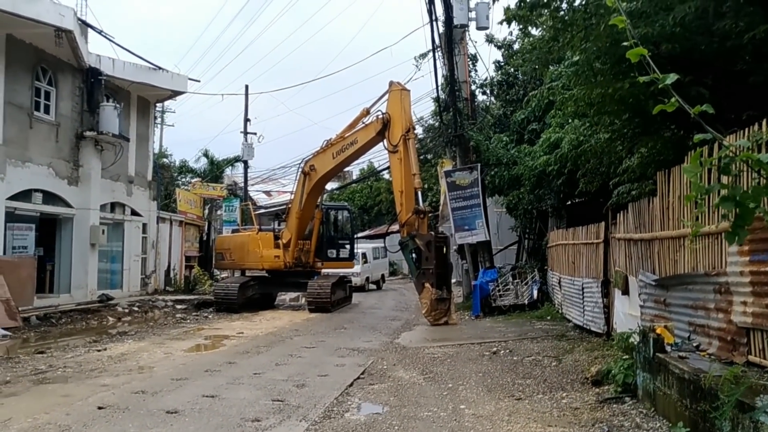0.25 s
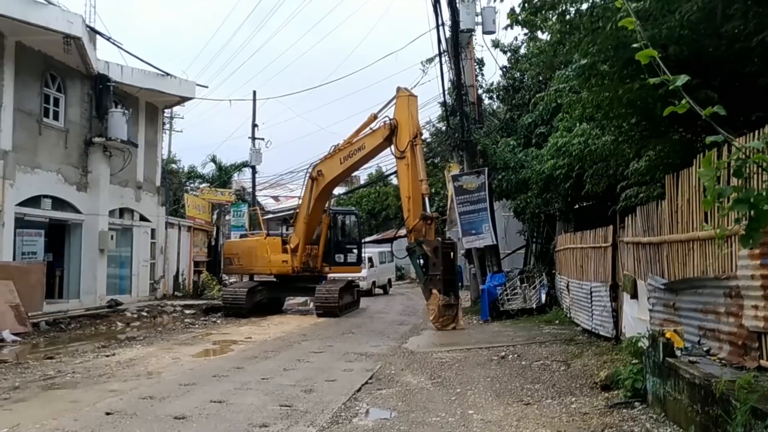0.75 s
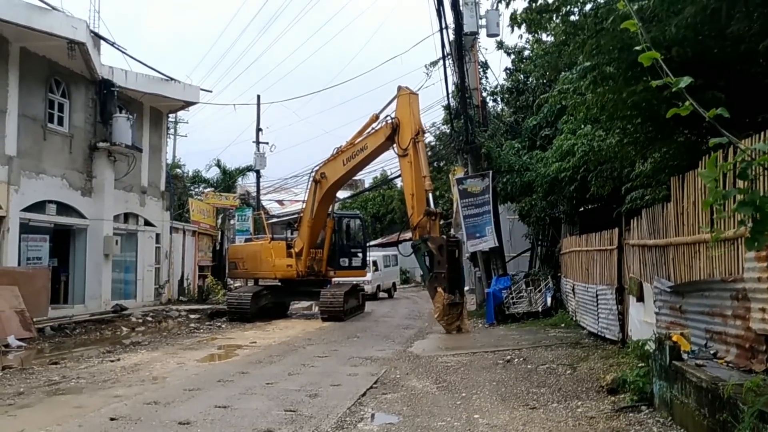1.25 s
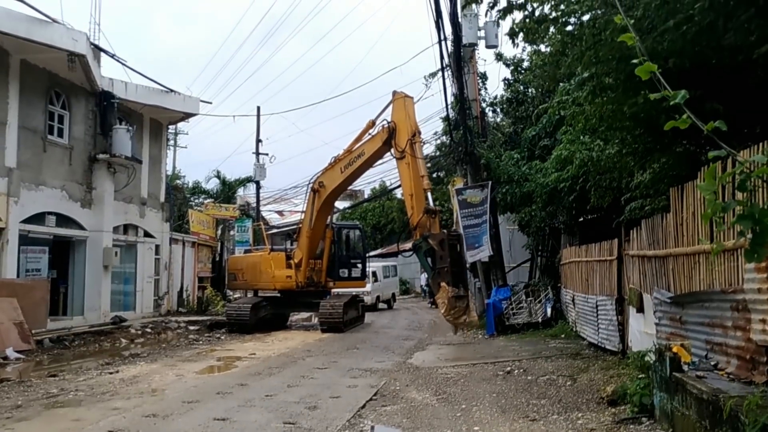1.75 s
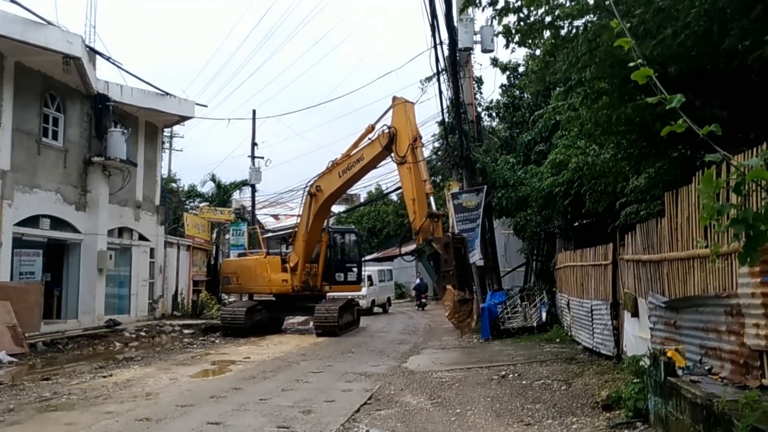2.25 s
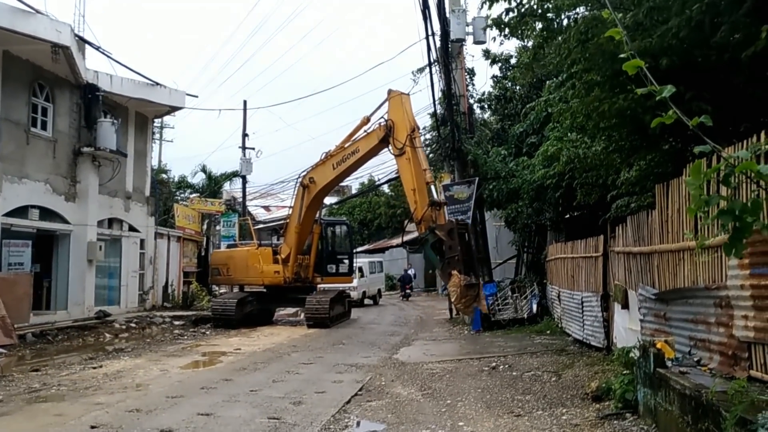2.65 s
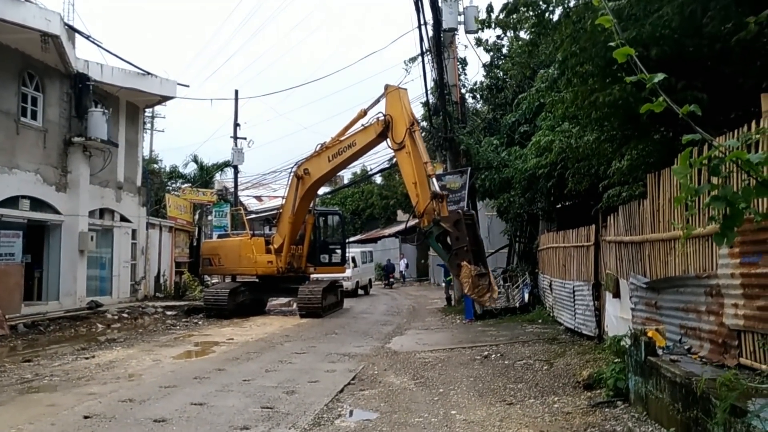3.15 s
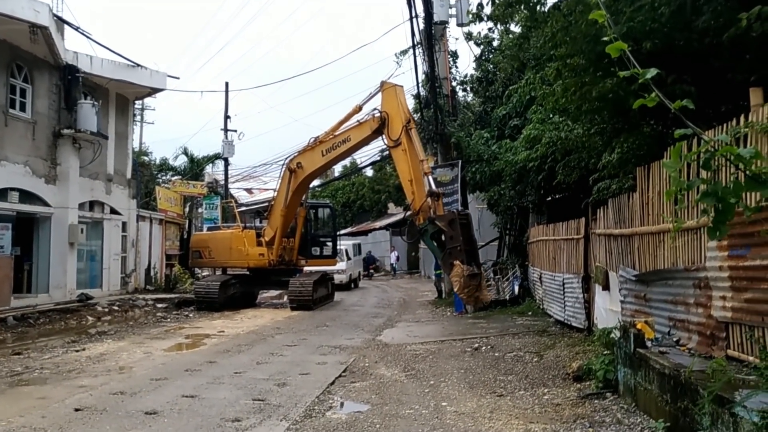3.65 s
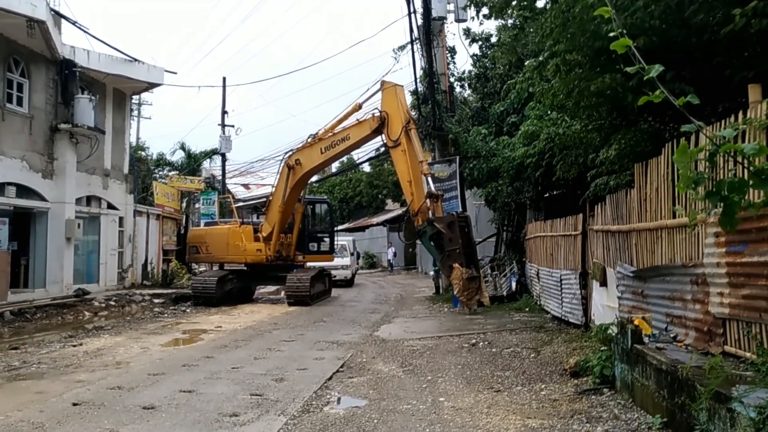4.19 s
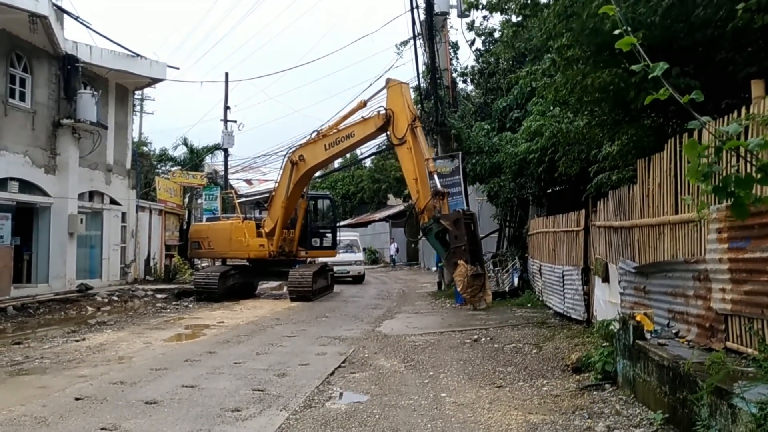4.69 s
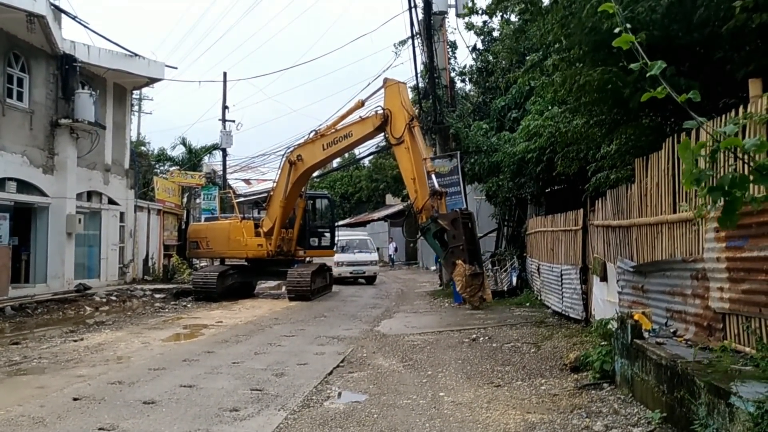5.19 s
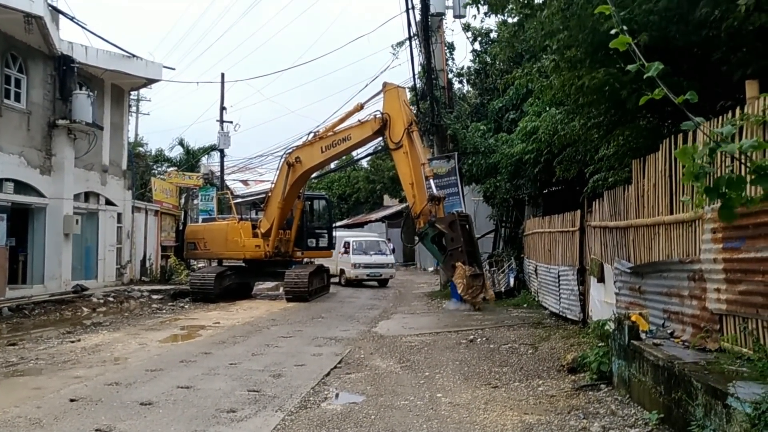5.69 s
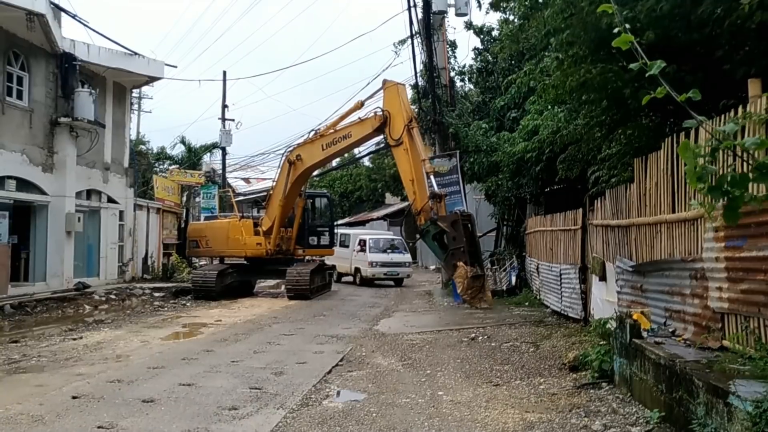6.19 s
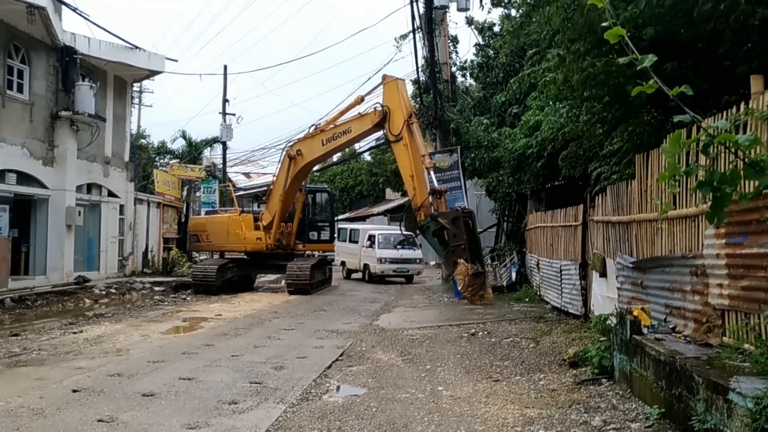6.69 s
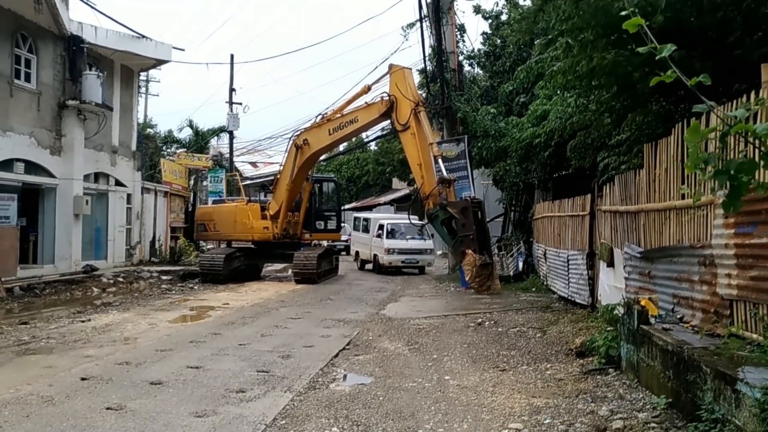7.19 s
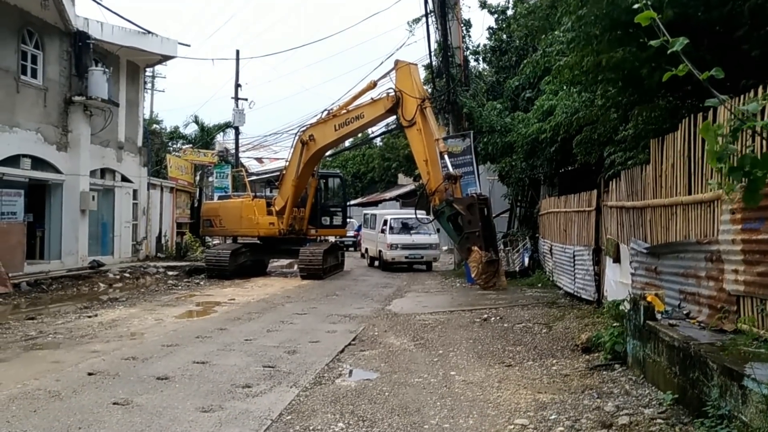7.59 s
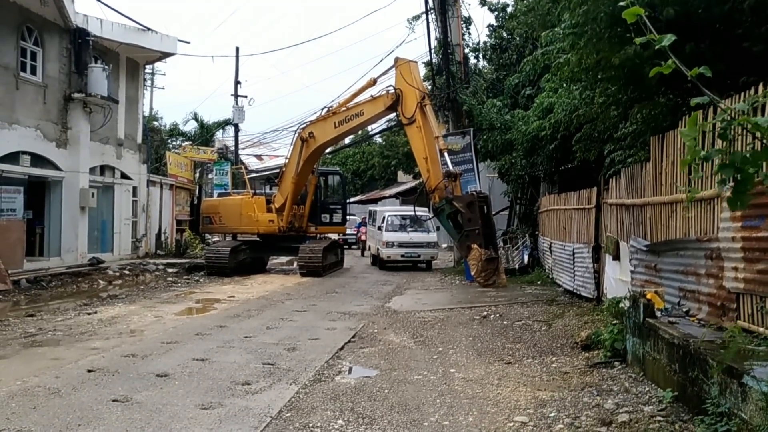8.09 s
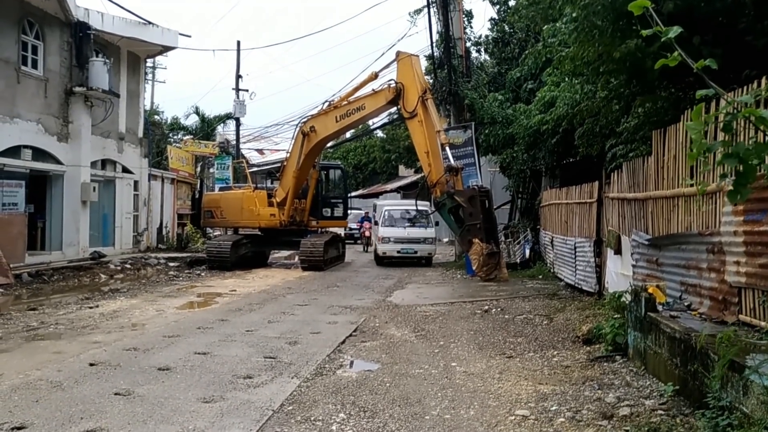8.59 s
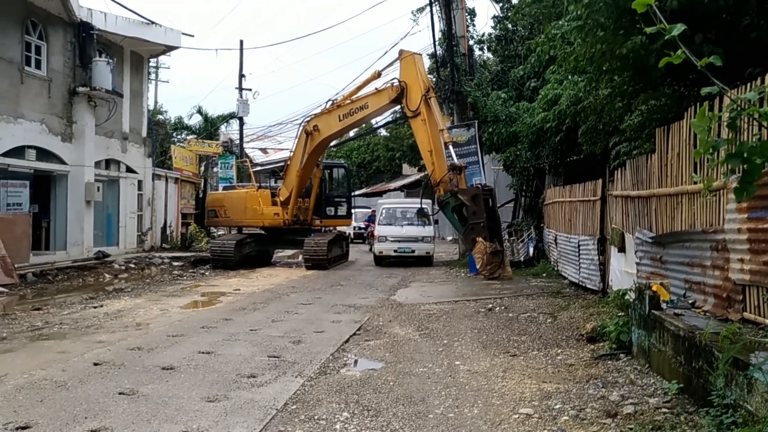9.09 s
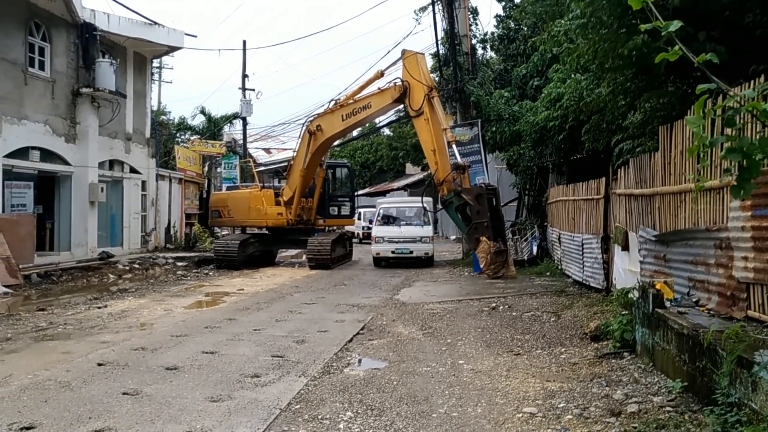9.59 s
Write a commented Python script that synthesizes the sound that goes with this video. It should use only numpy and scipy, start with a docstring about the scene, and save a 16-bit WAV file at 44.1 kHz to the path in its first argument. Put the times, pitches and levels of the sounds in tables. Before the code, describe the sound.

An excavator's hydraulic hammer strikes a concrete road in sharp, rapid blows, its loose steel housing clanking and ringing. After a second it stops, leaving the steady diesel drone, fading rattles and a little shifting rubble. About four seconds later the hammering starts again and keeps an even beat to the end. The machine is heard from a short way down a narrow street, with echoes off the houses.

```python
"""Sharp hammer blows and rattling steel come first: an excavator is breaking a concrete road.
An oil-driven piston strikes a chisel, and each crack slaps back from the houses of a narrow street.
The loose steel housing rattles and rings most when the chisel is not pressed down firmly.
After a second the hammer rests while the boom moves, leaving the six-cylinder diesel with its fan,
pump and turbo whistle, and a little shifting rubble. About four seconds later the blows start again."""
import sys
import numpy as np
from scipy import signal
from scipy.fft import rfft, irfft, next_fast_len
from scipy.io import wavfile
from scipy.ndimage import uniform_filter1d, minimum_filter1d

SR = 44100
rng = np.random.default_rng(int(sys.argv[2]) if len(sys.argv) > 2 else 0)


def persist_wave(psi):
    """Save psi, clipped to +-1, as 16-bit WAV."""
    counts = np.round(np.clip(psi, -1, 1) * 32767).astype(np.int16)
    wavfile.write(sys.argv[1], SR, np.atleast_2d(counts).T)


N = 434385
T = np.arange(N) / SR  # seconds since the start
AGE = np.arange(SR) / SR  # seconds since a hit

# Levels in the tables are relative: the functions set how loud each sound ends up.
# how often the engine fires, steady under load and wandering while the boom moves: t/s, f/Hz
FIRING_RATE = [(0.85, 77.7), (1.25, 76), (1.85, 79), (2.6, 78), (3.2, 78.9), (3.65, 81), (3.95, 80.3),
               (4.4, 78), (4.9, 80.2), (5.7, 77.2), (6.3, 77.7)]
# tones of the exhaust: multiple of the firing rate, level/dB
EXHAUST_TONES = [(1, 0), (3 / 2, -14), (11 / 6, -13), (2, -10), (4, -15)]
# tone colour of the engine's low rumble: f/Hz, level/dB
RUMBLE_COLOUR = [(25, -27), (40, -17), (55, -5), (90, -0.5), (148, 3.5), (172, -1.5), (225, -6), (265, -8),
                 (330, -13), (500, -18.5), (900, -44), (4000, -61)]
# tone colour of the engine's whir: f/Hz, level/dB
WHIR_COLOUR = [(200, -27), (450, -7), (720, 6.5), (1030, 1.5), (1180, 4), (1600, -1.5), (2300, 0.5),
               (3500, -3.5), (8200, -10), (9300, -13), (11300, -22), (14000, -60)]
# hiss of oil in the main valves: f/Hz, width/Hz, boost/dB
OIL_PEAKS = [(1170, 36, 3.5), (2650, 70, 7), (2870, 91, 4.5), (4750, 130, 5)]
# hum of the pump's pistons, growing as the boom presses down: t/s, level/dB
PUMP_HUM = [(1.2, -33.5), (3.0, -32.5), (3.7, -30.5), (5.05, -29.5), (5.6, -48)]
# pitch of the turbo's whistle: t/s, f/Hz
TURBO_PITCH = [(1.05, 11100), (1.6, 12200), (2.35, 11350), (2.95, 11550), (4.0, 10130), (5.05, 10350)]
# when the hammer is held on, which softens the exhaust: start/s, stop/s
HAMMER_ON = [(0.031, 1.0), (5.162, 9.8)]
# rubble shifting while the boom moves: t/s, level/dB
RUBBLE_SHIFTS = [(2.063, -41), (4.57, -36.5)]
# broken bits of concrete knocking together: t/s, level/dB, f/Hz
CHIP_KNOCKS = [(0.468, -13, 740), (0.585, -9, 560), (0.955, -15, 320), (0.963, -13, 876), (1.225, -18, 980),
               (1.312, -29, 910), (1.432, -27, 980), (1.613, -34, 1080), (1.723, -25, 930),
               (5.192, -9, 724), (5.214, -11, 716), (5.356, -16, 640), (5.778, -9, 1040)]
# notes of the steel chisel, housing and boom: f/Hz, level/dB, time to fade by 60 dB/s
STEEL_NOTES = [(185, -2, .25), (272, -5, .5), (453, -6, .4), (815, -1, .25), (1443, -5, .7), (1605, -1, .3),
               (2284, -2.5, .68), (2422, -11, .5), (2579, -9, .8), (2772, -2, .45), (3634, -7, .2),
               (4168, -4, .3), (4802, -12, .5), (6020, -11, .3), (6590, -7, .4)]
# the chisel jolts in its sleeve and rings the steel near one pitch; the row at 1.14 s is a thump of the boom:
# t/s, level/dB, f/Hz
CHISEL_JOLTS = [(0.262, -16, 1820), (.64, -18, 4200), (0.966, -8, 430), (1.14, -15, 186),
                (1.228, -21.5, 1770), (1.29, -24, 2200), (1.41, -28, 5100), (1.614, -37, 1770),
                (1.725, -31, 1880), (5.168, -20, 3470), (5.199, -17, 3000), (5.39, -13.5, 3430),
                (5.479, -17.5, 2150), (5.585, -21, 4400), (5.762, -23, 6000), (6.812, -16, 270),
                (6.985, -16, 270)]
# chisel and housing knocking together; the first row, at the very start, is the street's echo of a blow struck
# just before: t/s, level/dB, treble/dB
HOUSING_KNOCKS = [(0.002, -10, 5), (0.091, -8.5, 6), (0.246, -3.5, 1), (0.319, -11, 5), (0.416, -1.5, -1),
                  (0.564, -3, 3), (0.735, -14, 11), (1.162, -10.5, 5), (5.34, -9.5, -21),
                  (5.355, -6.5, -18)]
# tone colour of one heavy clank: f/Hz, level/dB
CLANK_COLOUR = [(120, -9), (420, -0.5), (1200, -2.5), (2900, -2), (5200, -4), (14500, -38)]
# spells of rattling in the loose housing: start/s, stop/s, level/dB
RATTLE_SPELLS = [(0, 0.746, -16), (0.962, 1.238, -24), (1.45, 1.806, -35.5), (5.18, 5.846, -18.5),
                 (5.9, 9.858, -28.5)]
# tone colour of that rattling: f/Hz, level/dB
RATTLE_COLOUR = [(120, -25), (190, 6.5), (280, 3.5), (464, 6), (824, 6.5), (1100, 2), (2690, 2), (4600, -6),
                 (8170, -6.5), (14500, -73)]
# pitches that the hammer's casing makes louder: f/Hz, width/Hz, boost/dB
CASING_PEAKS = [(273.5, 13, 6), (657, 15, 6.5), (1162, 26, 1), (1282, 170, 6.5), (1434, 104, 5.5),
                (2526, 28, 7), (2760, 25, 6), (3140, 690, 5), (3530, 110, 4)]
# tone colour of the street's echo: f/Hz, level/dB
ECHO_COLOUR = [(60, -14), (200, -1), (360, 1), (800, 3), (1000, 2), (1450, -3), (1900, 0.5), (3100, -2),
               (4500, -1), (8200, -4.5), (9500, -14), (11000, -18.5), (14000, -40)]
# tone colour of a blow's crack: f/Hz, level/dB
CRACK_COLOUR = [(60, -8), (130, 1.5), (250, 2.5), (420, -4), (560, -13), (750, 6), (1400, -4.5),
                (2000, -0.5), (2900, -1.5), (4500, -8.5), (8200, -3.5), (9500, -18), (14000, -25.5)]
# how the chisel's seat on the concrete shapes a blow: t/s, crack treble/dB, thud level/dB
CHISEL_SEAT = [(0.55, -3, -19), (0.95, -18, -9), (5.16, -32, -4), (5.76, -20, -3.5), (6.15, -6, -28),
               (6.5, -2, -18), (6.85, -8.5, -2), (7.4, -5.5, -17), (8.1, -3.5, -22), (8.65, -7.5, -6.5)]
# hammer blows: t/s, force/dB, concrete knock f/Hz, knock level/dB, chisel ring f/Hz
HAMMER_BLOWS = [(0.0317, -5, 808, -12.5, 3420), (0.1911, -4, 810, -9.5, 2700.0),
                (0.3528, 0.5, 795, -23, 2700.0), (0.5144, -3, 810, -12.5, 3140),
                (0.7033, -4.5, 842, -7.5, 3090), (0.9499, -5.5, 860, -21, 2640),
                (5.1628, -7, 947, -18, 2750), (5.3878, -3.5, 1525, -28, 2700),
                (5.5822, -5.5, 746, -25, 2760), (5.7607, -5.5, 1490, -14, 2720),
                (5.933, -2, 880, -34, 2705.0), (6.1069, -2, 1187, -11, 2719.0),
                (6.2783, -1.5, 829, -15, 3350), (6.4453, -2, 1330, -13, 3007.0),
                (6.6166, -2.5, 820, -19, 3410), (6.7948, -3, 810, -14, 3040),
                (6.9762, -2, 810, -14, 3074.0), (7.153, -1.3, 821.0, -20, 3413.0),
                (7.3253, -1.5, 1340, -18.7, 3103.0), (7.5, -1, 1490, -15, 3170),
                (7.6751, -1, 1460, -16, 3060), (7.8534, -2, 1300, -12, 2800),
                (8.0346, -1.3, 1470, -16, 2700), (8.2157, -2, 1480, -25, 2970), (8.402, -4, 830, -26, 3550),
                (8.591, -4, 872.0, -31, 3640), (8.7818, -5, 844, -24, 3448.0), (8.9718, -5, 843, -25, 2490),
                (9.1622, -5, 885, -29, 3429.0), (9.3487, -4.5, 1430, -21, 2998.0),
                (9.5355, -4.5, 1355, -16, 3100), (9.7277, -1.5, 808, -12, 3250)]
# how alike the street sounds on the left and right: f/Hz, likeness (1 = the same)
STEREO_LIKENESS = [(30, 0.99), (80, 0.93), (170, 1), (500, 0.87), (800, 1), (1400, 0.29), (3000, 0.047),
                   (10000, 0.019)]
# how much louder the left side is than the right: f/Hz, level/dB
LEFT_OVER_RIGHT = [(100, 1), (350, -0.5), (700, 1), (1300, 0), (2400, -3.5), (4300, -3.5), (8000, -10),
                   (9500, -0.5), (11500, 5.5), (14500, 10)]


def from_db(db):
    """Turn decibels into a factor to multiply by."""
    return 10 ** (np.asarray(db) / 20)


def rms_one(x):
    """Scale a sound so that its average strength (rms) is 1."""
    return x / np.sqrt(np.mean(x ** 2) + 1e-20)


def in_time(rows):
    """Join a table's points with straight lines, giving one curve per column after the time."""
    times, *columns = np.transpose(rows)
    return [np.interp(T, times, column) for column in columns]


def at_hz(points, hz):
    """Read a table at any frequency, giving each octave equal room."""
    f, value = np.transpose(points)
    return np.interp(np.log(hz + 1e-3), np.log(f), value)


def drift(rate):
    """A random wobble of strength 1 that takes `rate` turns a second."""
    points = rng.standard_normal(int(T[-1] * rate) + 2)
    return rms_one(np.interp(T * rate, np.arange(len(points)), points))


def filtered(x, hz, band="low", order=2):
    """Keep the low part, the high part or a band of a sound."""
    return signal.sosfilt(signal.butter(order, hz, band, fs=SR, output="sos"), x)


def add(out, t, sound):
    """Mix a sound in at t seconds."""
    start = round(t * SR)
    part = sound[..., :N - start]
    out[..., start:start + part.shape[-1]] += part


def noise(colour, size, lag_ms, focus, peaks=()):
    """Coloured stereo noise; focus draws it to one point, and the right side comes lag_ms later."""
    n = next_fast_len(size)
    hz = np.arange(n // 2 + 1) * SR / n
    boost_db = sum(db / (1 + (2 * (hz - f) / width) ** 2) for f, width, db in peaks)
    alike = np.clip(at_hz(STEREO_LIKENESS, hz), 0, 1)
    alike += focus * (1 - alike)
    mid, side = rfft(rng.standard_normal((2, n)))
    pair = np.sqrt(1 + alike) * mid + np.sqrt(1 - alike) * side * [[1], [-1]]
    pair[1] *= np.exp(-2j * np.pi * hz * lag_ms / 1000)
    return rms_one(irfft(pair * from_db(at_hz(colour, hz) + boost_db), n)[:, :size])


def clicks(times, level_db):
    """One tiny click for each contact."""
    out = np.zeros(N)
    out[np.clip(np.round(times * SR).astype(int), 0, N - 1)] = from_db(level_db)
    return out


def struck(hz, decay_s, rise_s=0.0012):
    """One note of a struck object: it builds quickly, then dies away."""
    age = AGE[:SR // 3]
    envelope = np.minimum(age / rise_s, 1) * np.exp(-age / decay_s)
    return envelope * np.sin(2 * np.pi * hz * age + rng.uniform(0, 2 * np.pi))


def ring_after_hits(hits, colour, envelope, repeat, lag_ms, focus):
    """Noisy ringing after each hit: the share `repeat` is always the same, the rest is new."""
    pattern = envelope * noise(colour, SR, lag_ms, focus)
    same = signal.oaconvolve(hits[None], pattern, axes=1)[:, :N]
    power = np.maximum(signal.oaconvolve(hits ** 2, envelope ** 2)[:N], 0)
    return np.sqrt(repeat) * same + np.sqrt((1 - repeat) * power) * noise(colour, N, lag_ms, focus)


def ring_after_blows(blows, colour, envelope, memory, lag_ms, focus, size=SR // 2):
    """Noisy ringing that changes as the chisel sinks; memory is how much each blow is like the last."""
    fresh = noise(colour, size * (len(blows) + 1), lag_ms, focus, CASING_PEAKS).reshape(2, -1, size)
    out, pattern = np.zeros((2, N)), fresh[:, -1]
    for k, (t, force_db) in enumerate(blows[:, :2]):
        pattern = memory * pattern + np.sqrt(1 - memory ** 2) * fresh[:, k]
        add(out, t, from_db(force_db) * envelope[:size] * pattern)
    return out


def set_treble(x, times, treble_db, corner_hz):
    """Turn the treble up or down anew at each contact."""
    low = filtered(x, corner_hz, order=1)
    latest_hit = np.maximum(np.searchsorted(times, T, side="right") - 1, 0)
    return low + (x - low) * from_db(treble_db[latest_hit])


def turbo():
    """The turbo spins with the engine's load and gives a soft, breathy whistle."""
    whistle_hz, = in_time(TURBO_PITCH)
    breath = rms_one(filtered(rng.standard_normal(N), 130))
    return from_db(-57.5) * breath * np.sin(2 * np.pi * np.cumsum(whistle_hz) / SR)


def diesel(normal_hz=78, fan_db_per_hz=1.9, blades_per_firing=2.563, hammer_dip_db=2):
    """Exhaust, fan and pump tones follow the engine's speed, over a rumble and a pulsing whir."""
    firing_hz, = in_time(FIRING_RATE)
    turbo_hz, = in_time(TURBO_PITCH)
    pump_db, = in_time(PUMP_HUM)
    phase = 2 * np.pi * np.cumsum(firing_hz) / SR
    hammer_on = sum(1.0 * (T > start) * (T < stop) for start, stop in HAMMER_ON)
    tones = sum(from_db(db + 1.5 * drift(8.6)) * np.sin(multiple * phase + rng.uniform(0, 2 * np.pi))
                for multiple, db in EXHAUST_TONES)
    exhaust = from_db(-27 - hammer_dip_db * uniform_filter1d(hammer_on, SR // 2)) * tones
    fan = from_db(-34 + fan_db_per_hz * (firing_hz - normal_hz)) * np.sin(blades_per_firing * phase)
    pump = from_db(pump_db) * np.sin(3 * phase)
    rumble = from_db(-28.5 + 0.82 * drift(25)) * noise(RUMBLE_COLOUR, N, lag_ms=0.15, focus=0.02)
    whir_db = -37.5 + 0.65 * (turbo_hz - TURBO_PITCH[0][1]) / 1000  # louder as the turbo speeds up
    whir_gain = from_db(whir_db + 1.06 * drift(16)) * (1 + 0.097 * np.sin(phase))
    whir = whir_gain * noise(WHIR_COLOUR, N, lag_ms=0.21, focus=0.049, peaks=OIL_PEAKS)
    return exhaust + fan + pump + rumble + whir


def rubble(band_hz, decay_s):
    """Broken pieces shift and knock dully against each other."""
    times, level_db = np.transpose(RUBBLE_SHIFTS)
    envelope = signal.oaconvolve(clicks(times, level_db), np.exp(-AGE / decay_s))[:N]
    return envelope * rms_one(filtered(rng.standard_normal(N), band_hz, "band"))


def chips(decay_s, extra_db):
    """Each bit of concrete gives a stony knock: one note, plus two softer ones that die sooner."""
    out = np.zeros(N)
    for t, db, hz in CHIP_KNOCKS:
        extra_notes = struck(hz, decay_s / 2) + struck(1.3 * hz, decay_s / 2)
        add(out, t, from_db(db) * (struck(hz, decay_s) + from_db(extra_db) * extra_notes))
    return out


def valve(blows, squeak_hz, delay_s, rise_s, decay_s, early_opening_s=4.925):
    """Oil squeaks through a valve as the piston lifts after each blow, and once before the restart."""
    times = np.append(blows[:, 0] + delay_s, early_opening_s)
    envelope = np.minimum(AGE / rise_s, 1) * np.exp(-AGE / decay_s)
    opening = signal.oaconvolve(clicks(times, 0), envelope)[:N]
    return from_db(-36) * opening * np.sin(2 * np.pi * np.cumsum(squeak_hz + 150 * drift(900)) / SR)


def steel(contacts):
    """A jolt rings the steel's notes near its pitch, rattling rings them all; echoes make them waver."""
    times, jolt_db, centre_hz = np.transpose(CHISEL_JOLTS)
    soften = np.exp(-1 / (0.00067 * SR))  # rounds off the start of each ring
    out = np.zeros((2, N))
    for hz, level_db, fade_s in STEEL_NOTES:
        jolts = clicks(times, jolt_db - 70 * np.log2(hz / centre_hz) ** 2)
        push = jolts + contacts * rng.standard_normal(N) + 1e-18
        step = np.exp((-np.log(1000) / fade_s + 2j * np.pi * hz) / SR)  # fade and swing per sample
        ring = signal.lfilter([from_db(level_db)], [1, -step], push)
        ring = signal.lfilter([1 - soften], [1, -soften * step], ring)
        out += [(ring * (1 + 0.42 * (drift(45) + 1j * drift(45)))).real for side in range(2)]
    return out


def housing(contacts_per_s=140, settle_db_per_s=58):
    """Loose steel clanks, and rattles in spells of small contacts that the street blurs into a wash."""
    times, level_db, treble_db = np.transpose(HOUSING_KNOCKS)
    knocks = clicks(times, level_db)
    clank_fade = np.exp(-AGE / 0.02) + from_db(-5.5) * np.exp(-AGE / 0.11)
    clank = ring_after_hits(knocks, CLANK_COLOUR, clank_fade, repeat=0.76, lag_ms=0.1, focus=0.16)
    clank = set_treble(clank, times, treble_db, corner_hz=3520)
    shaking = np.max([(T >= start) * from_db(db - settle_db_per_s * np.maximum(T - stop, 0))
                      for start, stop, db in RATTLE_SPELLS], axis=0)
    contacts = (rng.random(N) < contacts_per_s / SR) * shaking * from_db(2 * rng.standard_normal(N))
    rattle_fade = np.exp(-AGE / 0.018) + from_db(-19.5) * np.exp(-AGE / 0.017)
    rattle = ring_after_hits(contacts, RATTLE_COLOUR, rattle_fade, repeat=0.75, lag_ms=0.12, focus=0.06)
    wash = from_db(-19.5) * shaking * noise(ECHO_COLOUR, N, lag_ms=0.223, focus=0.05, peaks=CASING_PEAKS)
    return from_db(-11) * clank + from_db(-2.5) * rattle + wash + steel(from_db(-22.5) * contacts)


def street_echo(blows, split_hz=2660):
    """Each blow slaps back from the house fronts; the treble returns first and dies first."""
    out = 0
    for band, delay_s, fade_s in (("low", 0.0281, 0.74), ("high", 0.025, 0.46)):
        since = np.maximum(AGE - delay_s, 0)
        envelope = np.minimum(since / 0.0053, 1) * np.exp(-np.log(1000) * since / fade_s)
        wash = ring_after_blows(blows, ECHO_COLOUR, envelope, memory=0.62, lag_ms=0.282, focus=0.06)
        out += filtered(wash, split_hz, band)
    return out


def chisel_on_concrete(blows, slab_hz=259.5, clink_notes=6):
    """The slab thuds, the piece under the chisel knocks, and the chisel rings and clinks."""
    out = np.zeros((2, N))
    _, thud_db = in_time(CHISEL_SEAT)
    for t, force_db, knock_hz, knock_db, ring_hz in blows:
        slab = sum(struck(slab_hz * ratio * (1 + 0.094 * rng.standard_normal()), 0.011, rise_s=0.003)
                   for ratio in (0.76, 1.05, 1.8))
        thud = from_db(thud_db[round(t * SR)] - 7.5) * slab
        clink_hz = np.exp(rng.uniform(np.log(1000), np.log(4600), clink_notes))
        clink = np.array([sum(struck(hz, decay_s=0.015) for hz in clink_hz) for side in range(2)])
        knock = from_db(knock_db + 3) * struck(knock_hz, decay_s=0.015)
        ring = from_db(-14) * struck(ring_hz, decay_s=0.012)
        add(out, t, thud + knock + ring + from_db(force_db - 18.5) * clink)
    return out


def hammer(blows):
    """The piston drives the chisel into the road: a hard crack, a short ring of the casing, an echo."""
    times = blows[:, 0]
    seat_times, treble_db, _ = np.transpose(CHISEL_SEAT)
    fade = np.exp(-(AGE / 0.015) ** 2) + from_db(-5.5) * np.exp(-AGE / 0.052)
    envelope = np.minimum(AGE / 0.0022, 1) * fade
    crack = ring_after_blows(blows, CRACK_COLOUR, envelope, memory=0.82, lag_ms=0, focus=0.53)
    crack = set_treble(crack, times, np.interp(times, seat_times, treble_db), corner_hz=2970)
    return from_db(-7) * crack + from_db(-9) * street_echo(blows) + chisel_on_concrete(blows)


def scene():
    """The whole machine at work, a little way up the street."""
    blows = np.array(HAMMER_BLOWS)
    breaker = hammer(blows) + housing()
    squeaks = valve(blows, squeak_hz=11000, delay_s=0.11, rise_s=0.0089, decay_s=0.02)
    stones = chips(decay_s=0.0071, extra_db=-12) + rubble(band_hz=[450, 1000], decay_s=0.12)
    return breaker + squeaks + stones + diesel() + turbo()


def limiter(x, ceiling_db=-0.8, ahead_s=0.0085):
    """Turn the sound down just before a peak would pass the ceiling, and back up just after."""
    gain_db = np.minimum(ceiling_db - 20 * np.log10(np.abs(x).max(axis=0) + 1e-9), 0)
    width = int(2 * ahead_s * SR)
    return x * from_db(uniform_filter1d(minimum_filter1d(gain_db, width), width // 2))


def record(dry):
    """Give each side its own tone colour, cut the deepest bass, tame the peaks and cut the very top."""
    lowest_hz, highest_hz = 26, 14400
    n = next_fast_len(N + SR // 10)
    hz = np.arange(n // 2 + 1) * SR / n
    side_db = at_hz(LEFT_OVER_RIGHT, hz) * [[0.5], [-0.5]]
    heard = irfft(rfft(dry, n) * from_db(side_db), n)[:, :N]
    heard = limiter(filtered(heard, lowest_hz, "high"))
    return signal.sosfilt(signal.ellip(10, 0.2, 80, highest_hz, fs=SR, output="sos"), heard)


dry = scene()
out = record(dry)
persist_wave(out)
```